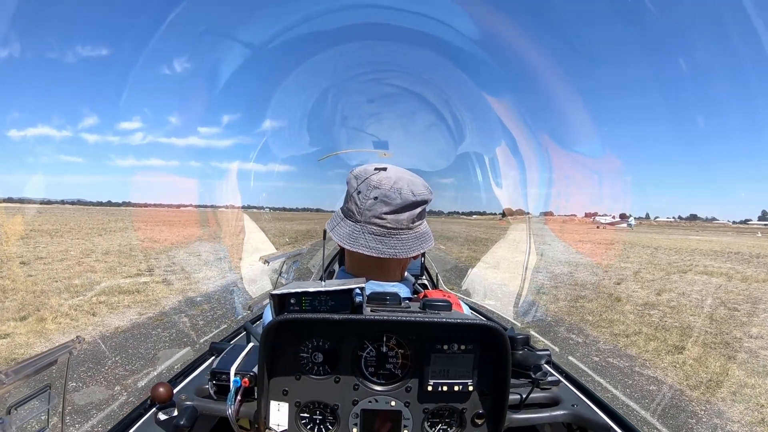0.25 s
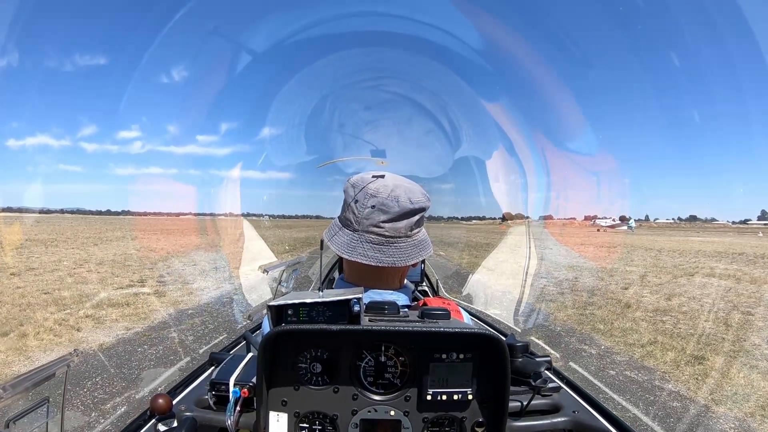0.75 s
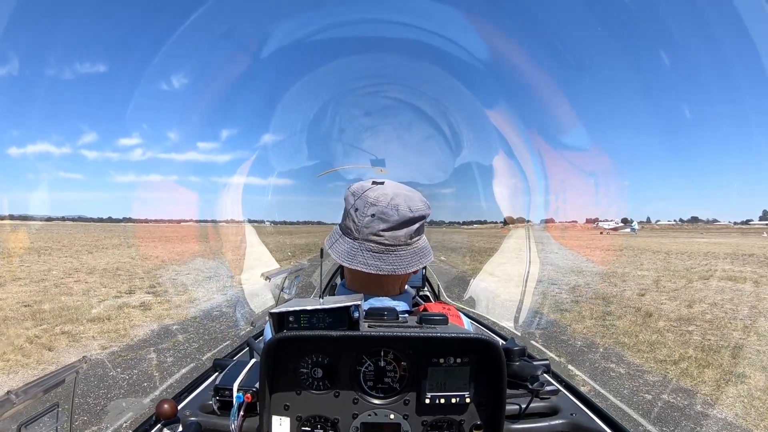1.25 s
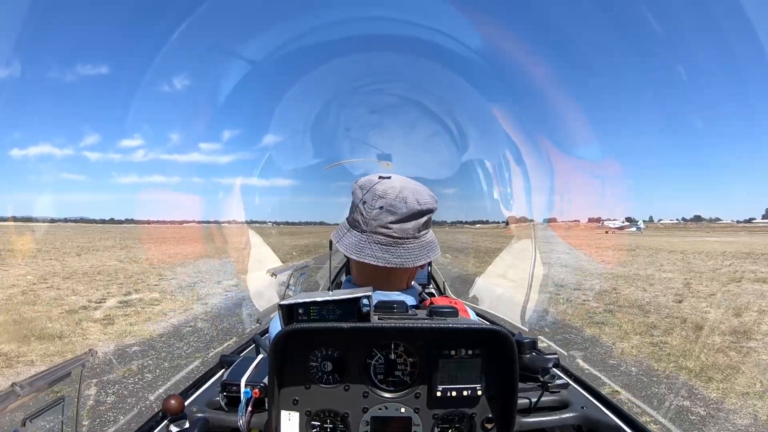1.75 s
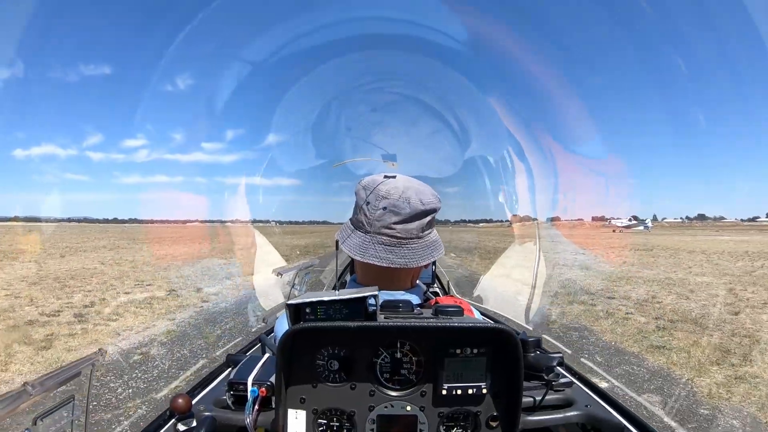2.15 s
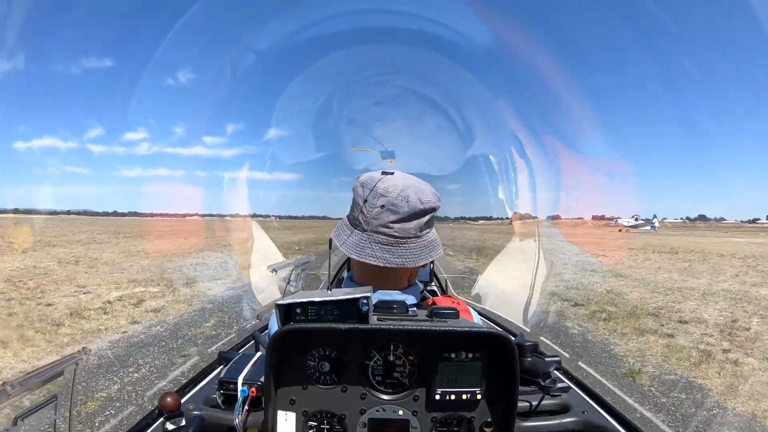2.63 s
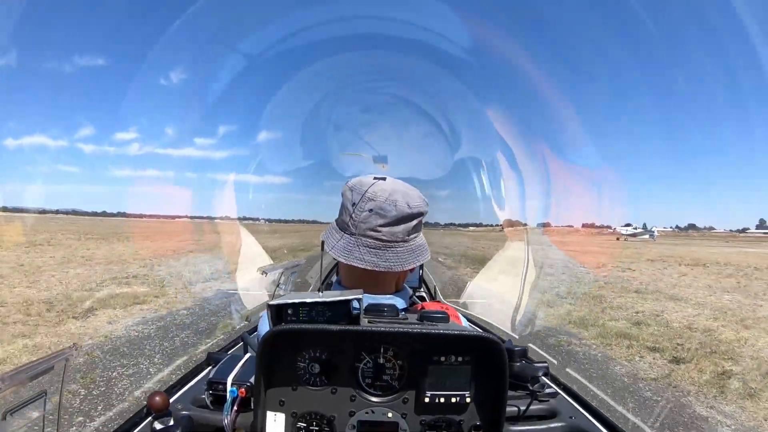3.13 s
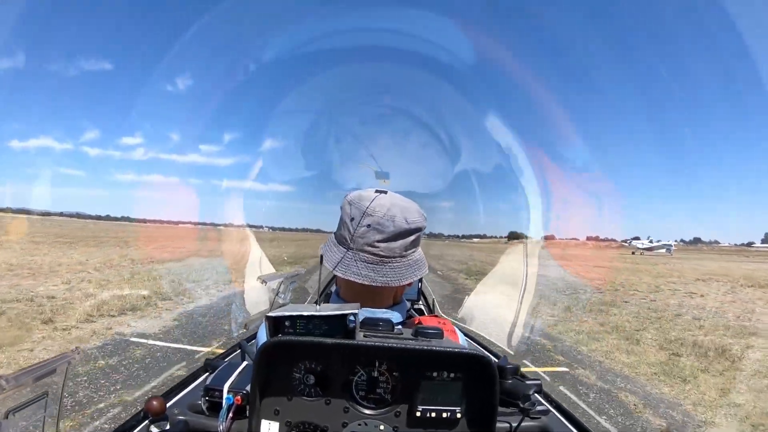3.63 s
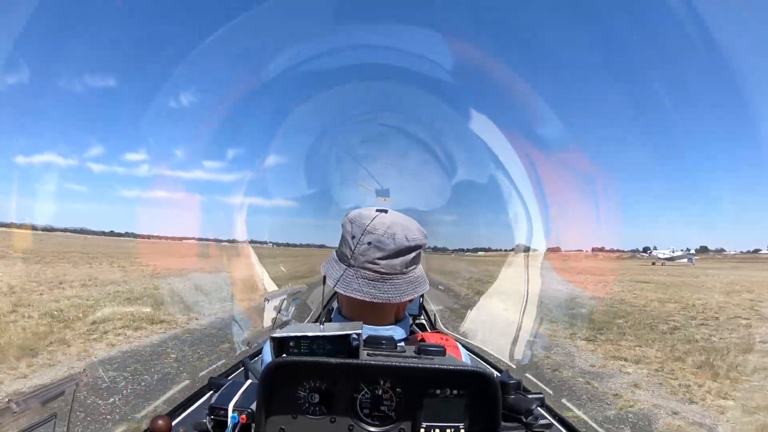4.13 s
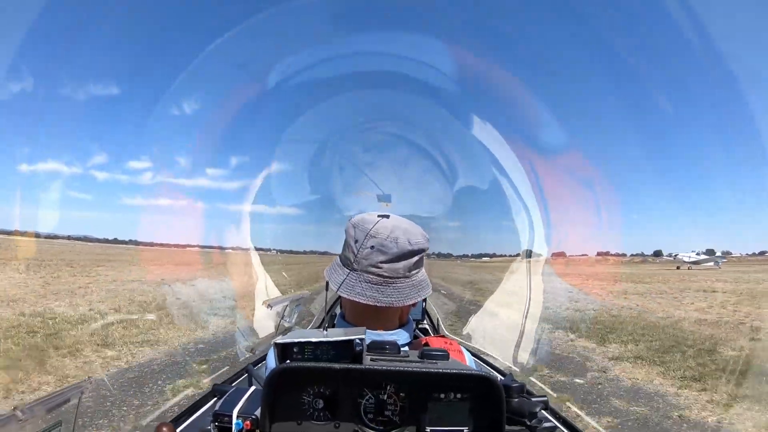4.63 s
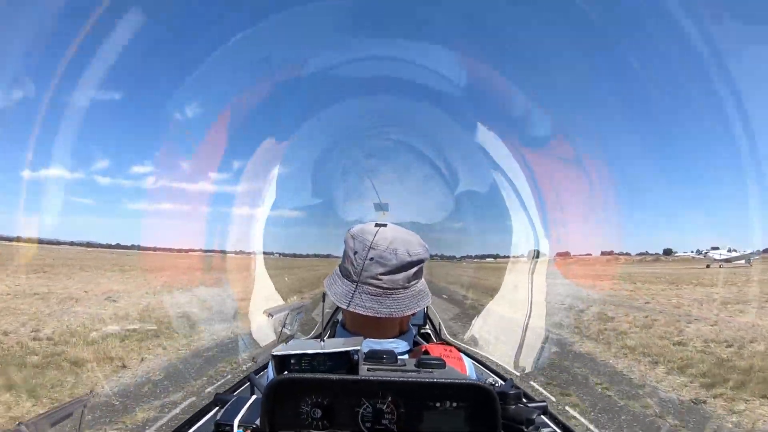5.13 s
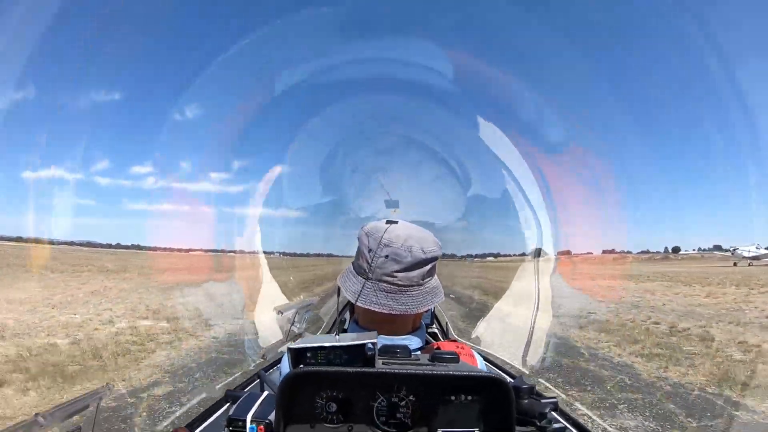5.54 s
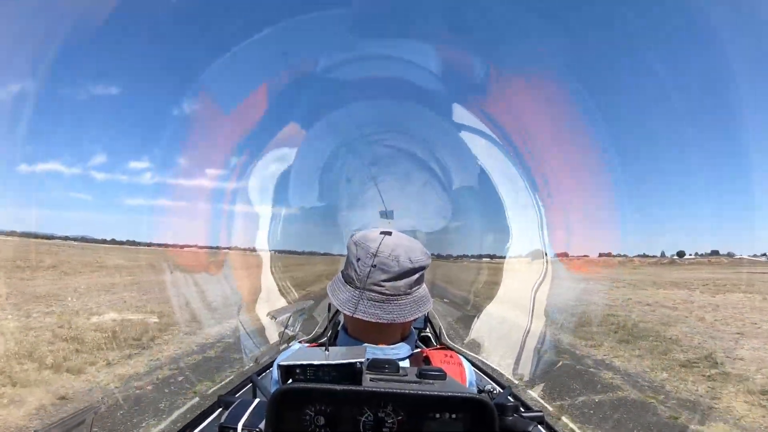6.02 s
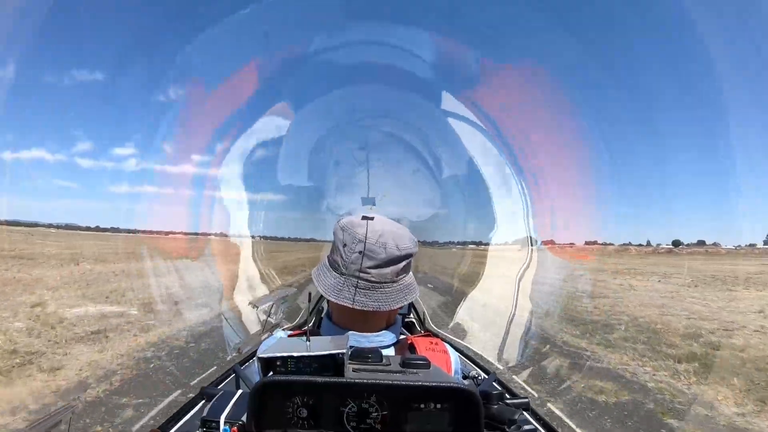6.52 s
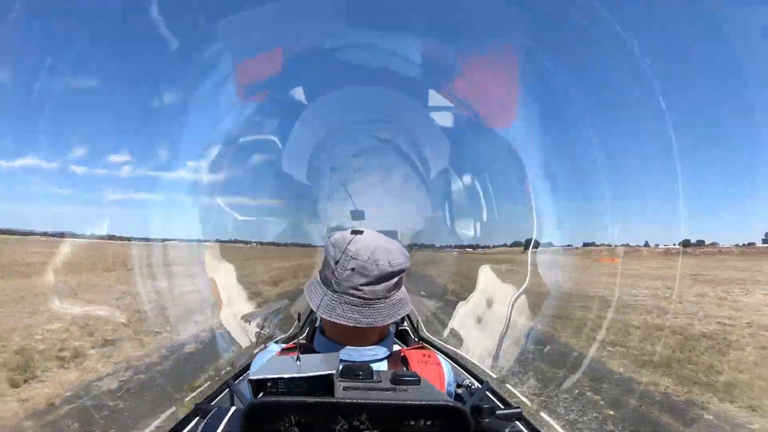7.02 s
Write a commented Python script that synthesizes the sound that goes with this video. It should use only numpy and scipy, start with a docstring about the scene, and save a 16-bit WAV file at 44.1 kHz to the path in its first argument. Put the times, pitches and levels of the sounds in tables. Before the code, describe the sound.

From a microphone inside a closed glider cockpit, a deep wheel rumble starts slowly and swells as the aircraft is towed down a runway. Early on, a cluster of hollow thumps hits the hull. Irregular ticks, light panel buzz and small scuffs follow over the rising tyre roar, with a weak drone underneath. Late on come a short creak and a last, softer bump while the rumble carries on.

```python
"""Inside the cockpit of a glider towed along a rough runway. It starts at a slow roll: the wheel shakes
the hull into a low boom over a drone, panels buzz, straps and seat rustle and scuff. Around the first two
seconds bumps knock the shell, and loose fittings begin to tick. As speed builds the boom swells and the
tyre roar rises; a joint creaks at 5.5 s and one last knock lands at 6.5 s. All of it is heard through
the two close ports of a small camera that holds the level down."""
import sys
import numpy as np
from scipy import signal
from scipy.fft import rfft, irfft, next_fast_len
from scipy.io import wavfile
from scipy.ndimage import uniform_filter1d, map_coordinates

SR = 44100
rng = np.random.default_rng(int(sys.argv[2]) if len(sys.argv) > 2 else 0)


def int16_out(signal):
    """Quantize to a 16-bit WAV file."""
    q = np.round(np.clip(np.atleast_2d(signal).T, -1, 1) * 32767)
    wavfile.write(sys.argv[1], SR, q.astype(np.int16))


N = 320607

# Roughness of the runway under the wheel. Each row: time in seconds, level in dB.
RUNWAY_ROUGHNESS = [(0, 0.5), (.62, 0.5), (.75, -2.5), (.9, 2), (1.5, 0.5), (1.69, 0.5), (2.04, 3.5),
                    (2.48, 3), (2.8, 2), (3.8, 3), (4.48, 2), (5.13, 3), (5.35, -0.7), (5.75, 0.5),
                    (6.25, -2.5), (6.55, 0.7), (7.09, -1.5), (7.25, 1)]
# The ring of the loose fittings. Each row: pitch in Hz, width in Hz, level in dB.
FITTING_MODES = [(1340, 500, 8.5), (2180, 700, 4.5), (3050, 680, 4.5), (3950, 660, -7), (4560, 430, 0),
                 (5720, 650, 4), (6700, 1300, 0)]


def hull_boom(roughness_db):
    """The wheel shakes the low hull modes: a throbbing boom that grows with speed, then levels off."""
    # Each row: pitch in Hz, width in Hz, level in dB.
    hull_modes = [(28.2, 4.7, -14), (66.1, 7.5, -1.5), (87.8, 21, -7), (114.65, 10.7, -1.5),
                  (132.3, 16, -3), (165, 25, -9), (186.1, 8.2, -9)]
    # Each row: time in seconds, hum level in dB, deep mode level in dB, both relative to the boom.
    low_end_mix = [(0, -12.5, -3.5), (1.55, -8.5, -2.5), (1.8, -2.5, -9.5), (4.9, -6, -11.5),
                   (5.6, -8, -2.5), (7.25, -4, -10)]
    top_db, knee_m_per_s, hum_hz = -16.5, 4.46, 66.5
    throb = amp(2.96 * wobble(5))
    boom = unit(filtered(throb * rng.standard_normal((2, N)), modes(hull_modes)))
    # A wandering hum and its octave sit inside the strongest mode.
    hum_db, deep_db = curves(low_end_mix)
    phase = 2 * np.pi * np.cumsum(hum_hz + 2.2 * wobble(7)) / SR
    hum_gain = amp(hum_db + 4.5 * wobble(6))
    octave = amp(-10 + 4.5 * wobble(5)) * np.sin(2 * phase)
    deep_mode = unit(filtered(rng.standard_normal(N), modes([(50.44, 8, 0)])))
    boom[0] += hum_gain * (np.sin(phase) + octave) + amp(deep_db) * deep_mode
    growth = (speed() / np.hypot(speed(), knee_m_per_s)) ** 2.34
    return growth * amp(top_db + roughness_db) * filtered(boom, lambda f: 1 / (1 + (f / 260) ** 4))


def tyre_roar(roughness_db):
    """The tyre roars louder with speed; the stiff hull cuts it steeply under and over its modes."""
    # Each row: pitch in Hz, width in Hz, level in dB.
    roar_modes = [(210.4, 33.6, 2.5), (257.6, 37.8, 2), (300.4, 46.2, 0.5), (378.6, 56, -5.5),
                  (460.6, 108.5, -13), (578, 16, -27.5), (755.6, 16, -20), (936, 54, -37.5)]
    walls = lambda f: modes(roar_modes)(f) * low_cut(f, 190) / (1 + (f / 900) ** 4)
    roar = unit(filtered(rng.standard_normal((2, N)) * amp(wobble(9)), walls))
    return (speed() / 10) ** 1.42 * amp(-27.5 + roughness_db) * roar


def shell_knocks():
    """A bump rings the low, middle and high modes of the shell; its hard edge snaps a few ms later."""
    # Each row: start in seconds, then thump, body, ring and snap levels in dB.
    bumps = [(0.8165, 6.5, 0.5, -4, -32.5), (0.904, -2, -7.5, -35, -44), (0.944, 9, 0.5, -39, -40),
             (1.096, 10, 0, -5, -31), (1.403, -8.5, -13.5, -33, -50), (1.494, 6, 1, -7, -38.5),
             (1.608, 0, -25, -18, -47.5), (1.998, 2, -11, -36, -51.5), (6.509, 1.5, -12, -34, -56)]
    # Each row: pitch in Hz, width in Hz, level in dB.
    shell_modes = [(245, 110, -1), (420, 360, -8), (590, 254, -4), (736, 110, -6.5), (870, 160, -3.5),
                   (1140, 130, -1.5), (1413, 87, 4), (1660, 320, -5)]
    start, thump_db, body_db, ring_db, snap_db = np.transpose(bumps)
    t60 = np.where(ring_db > -14, .047, .071)  # hard, ringing knocks are shorter
    thump = blows(start, thump_db, t60, shell_modes[:2], rough=.3, soft_hz=910)
    # The thump comes back once, a cycle of the shell later.
    rebound = blows(start + .00418, thump_db - 2.5, t60, shell_modes[:2], rough=.37, soft_hz=900)
    body = blows(start, body_db, t60, shell_modes[2:5], rough=.35, soft_hz=2570)
    ring = blows(start + .0012, ring_db, t60, shell_modes[5:], rough=.4, soft_hz=4110)
    snap = blows(start + .0048, snap_db, t60, FITTING_MODES[1:6])
    return thump + rebound + body + ring + snap


def fitting_ticks():
    """Loose fittings tick, each with its own brightness; faint ticks fall between, more often at speed."""
    # Each row: start in seconds, level in dB, upper modes relative to the lower in dB.
    main_ticks = [(1.3603, -31.5, -1.5), (1.6342, -37.5, -2.5), (1.937, -40, 2.5), (2.2176, -39, -2),
                  (2.3359, -44, -2.5), (2.374, -44.5, 4), (2.3974, -44.5, 0), (2.7107, -40.5, 1.5),
                  (2.843, -37, -2.5), (2.862, -41.5, 2.5), (3.2709, -23.5, 1), (3.357, -40, -11.5),
                  (3.6548, -38.5, 0), (3.7405, -34, 1), (3.8025, -32.5, -5), (3.8526, -39, -8),
                  (4.05, -55.5, 16), (4.0801, -40, -16.5), (4.2641, -42.5, -15.5), (4.2957, -38, -11.5),
                  (4.488, -39, -14), (4.6276, -37.5, -7.5), (5.0127, -32.5, -4.5), (5.047, -42.5, 0),
                  (5.065, -46, -1), (5.1133, -37.5, -8), (5.1514, -35.5, -0.5), (5.183, -42, -7),
                  (5.2, -42.5, -14), (5.222, -38.5, -6.5), (5.249, -31.5, -4), (5.273, -38, -13),
                  (5.293, -41, -7), (5.3284, -36.5, -8), (5.3649, -38, 4), (5.5025, -25, -2.5),
                  (5.8097, -36.5, 9), (5.8308, -37, 6), (5.909, -42.5, 5), (6.187, -45, 3.5),
                  (6.5979, -33, 1), (6.6704, -40, -22), (6.7157, -38, -12), (6.9371, -41, -13.5),
                  (7.089, -35.5, -2)]
    faint_count = 20
    travelled = np.cumsum(speed())
    faint_starts = np.searchsorted(travelled, rng.random((faint_count, 1)) * travelled[-1]) / SR
    faint_levels = rng.normal([-48.5, -8], 3.5, (faint_count, 2))
    start, db, upper_db = np.vstack([main_ticks, np.hstack([faint_starts, faint_levels])]).T
    t60 = np.full(len(start), .05)
    lower = blows(start, db, t60, FITTING_MODES[:4], rough=.78)
    upper = blows(start, db + upper_db, t60, FITTING_MODES[4:], rough=.69)
    return lower + upper


def panel_buzz(level_db):
    """Panels buzz with the shaking, a few of their modes standing out."""
    # The tone of the buzz. Each row: frequency in Hz, level in dB.
    buzz_tone = [(530, -28), (900, -0.5), (1210, -2), (1310, -3), (1450, -3), (2040, -8), (2600, -25),
                 (3380, -58.5), (5720, -120)]
    # Each row: pitch in Hz, width in Hz, level in dB.
    panel_modes = [(1190, 95, -3), (1320, 76, 1.5), (1690, 130, -8.5), (1910, 100, -4)]
    colour = lambda f: amp(along(buzz_tone, f)) * (1 + np.abs(modes(panel_modes)(f)))
    buzz = filtered(contact_noise(per_second=33, size_db=-.5, t60=.06), colour)
    return amp(level_db) * patchy(buzz, depth_db=.5)


def strap_rustle(level_db):
    """Seat cloth and straps rustle in many small, quick contacts."""
    # The tone of the rustle. Each row: frequency in Hz, level in dB.
    rustle_tone = [(1500, -31.5), (2250, -4.5), (2650, -5.5), (3350, -7.5), (4000, -11.5), (5800, -9.5),
                   (7000, -12.5), (8000, -21.5), (10000, -29), (12500, -39), (15500, -50.5)]
    contacts = contact_noise(per_second=55, size_db=-2, t60=.014)
    rustle = filtered(contacts, lambda f: amp(along(rustle_tone, f)))
    return amp(level_db + 1.3 * wobble(22)) * patchy(rustle, depth_db=2)


def cabin(roughness_db):
    """One shake moves both panels and straps; rough ground lifts the buzz a little."""
    # Each row: time in seconds, buzz level in dB, rustle level in dB.
    faders = [(0, -62.5, -68.5), (.4, -64.5, -72.5), (.89, -60, -66), (1.03, -55, -54),
              (1.27, -55.5, -65.5), (1.82, -56.5, -63), (2.2, -60, -66), (3.23, -59, -65), (3.9, -57, -66),
              (4.7, -54, -67), (5.2, -51.5, -61.5), (5.6, -53.5, -60), (5.98, -51.5, -66.5),
              (6.66, -46.5, -62), (7.25, -51, -62)]
    buzz_db, rustle_db = curves(faders)
    shake = wobble(9.9)
    return panel_buzz(buzz_db + .26 * roughness_db + .97 * shake) + strap_rustle(rustle_db + .26 * shake)


def scuffs():
    """Brief swells of crackly friction, dull from the hull, bright from cloth or strap."""
    # Each row: start in seconds, length in seconds, centre in Hz, width in Hz, level in dB.
    rubs = [(0.17, 0.073, 7000, 1600, -69), (0.673, 0.03, 3700, 400, -63), (0.89, 0.21, 6100, 1800, -58),
            (1.1, 0.34, 5300, 2800, -62), (1.91, 0.066, 7000, 1000, -62.5), (2.01, 0.073, 7000, 1400, -61),
            (2.095, 0.075, 5700, 2700, -56.5), (2.7, 0.05, 8100, 1200, -65), (0.11, 0.18, 493, 65, -42.5),
            (0.5007, 0.047, 290, 140, -29.5), (0.485, 0.055, 600, 970, -48), (7.02, 0.12, 1300, 930, -41.5),
            (4.96, 0.7, 2800, 900, -62.5), (3.355, .05, 1700, 150, -54.5),
            (3.745, 0.053, 1900, 1200, -50.5), (1.59, 0.4, 1210, 35, -57.5),
            (1.684, 0.24, 1600, 260, -56.5), (6.464, 0.17, 780, 110, -39), (6.676, 0.048, 350, 60.5, -53),
            (6.758, 0.14, 650, 290, -37.5)]
    out = np.zeros((2, N))
    grit = amp(3.5 * wobble(300)) * rng.standard_normal((2, N))
    for start, length, hz, width_hz, db in rubs:
        at, n = round(start * SR), round(length * SR)
        band = np.exp(-((np.fft.rfftfreq(n, 1 / SR) - hz) / width_hz) ** 2)
        rub = unit(irfft(rfft(grit[:, at:at + n]) * band, n))
        out[:, at:at + n] += amp(db) * np.hanning(n) ** .55 * rub
    return out


def joint_creaks():
    """A joint slips unevenly, about 200 times a second, ringing a sinking resonance and its overtone."""
    # Each row: start in seconds, length in seconds, first pitch in Hz, last pitch in Hz, level in dB.
    creaks = [(5.43, .065, 1600, 1500, -41), (5.515, .035, 1680, 1550, -39), (5.548, .03, 1200, 1120, -37)]
    out, t = np.zeros((2, N)), np.arange(600) / SR
    envelope = (1 - np.exp(-t / .0004)) * amp(-60 * t / .051) * np.hanning(2 * len(t))[len(t):]
    for start, length, first_hz, last_hz, db in creaks:
        for elapsed in np.arange(0, length, .0052):
            hz = (first_hz + (last_hz - first_hz) * (elapsed / length) ** 2) * rng.normal(1, .044)
            slip = np.sin(2 * np.pi * hz * t) + .19 * np.sin(2 * np.pi * 1.9 * hz * t)
            slip *= amp(db + rng.normal(0, 2.8)) * envelope
            swell = np.sin(np.pi * (elapsed + .0051) / (length + .019)) ** .36
            at = round((start + elapsed + rng.normal(0, .001)) * SR)
            out[:, at:at + len(t)] += swell * slip
    return out


def thin_clicks():
    """Tiny bright clicks: fast-dying noise in one wide, high band."""
    # Each row: start in seconds, level in dB.
    clicks = [(2.374, -58), (3.6554, -64.5), (5.3651, -56), (5.579, -68.5), (6.5977, -59.5), (7.1324, -63)]
    centre_hz, width_hz, t60 = 11500, 5000, .02
    out, t = np.zeros((2, N)), np.arange(SR // 20) / SR
    for start, db in clicks:
        at = round(start * SR)
        out[:, at:at + len(t)] += amp(db - 60 * t / t60) * rng.standard_normal((2, len(t)))
    band = modes([(centre_hz, width_hz, 0)])
    return filtered(out, lambda f: band(f) ** 2)


def drone():
    """A bed of noise in narrow resonances, likely the tow plane heard through the canopy."""
    # Each row: pitch in Hz, width in Hz, level in dB.
    drone_modes = [(248, 19, -6), (287, 43, -3), (391, 55, 0), (510.5, 52.3, -2.5), (733, 20, -8),
                   (1207, 20, -19), (3364, 26, -26.5), (5300, 170, -44)]
    # The drone sinks midway and comes back. Each row: time in seconds, level in dB.
    fader = [(0, -47.5), (.1, -47.5), (1.5, -46), (3.5, -57), (7.25, -42.5)]
    gain = amp(curves(fader)[0] + 2 * wobble(10))
    colour = lambda f: modes(drone_modes)(f) * low_cut(f, 230)
    return gain * unit(filtered(rng.standard_normal((2, N)), colour))


def speed():
    """Rolling speed in m/s, rising steadily under tow."""
    return 1.34 + 1.797 * np.arange(N) / SR


def blows(starts, levels_db, t60s, mode_table, rough=1, soft_hz=7000):
    """Each blow rings the modes at fresh strengths; rough blends from one clean push to dying noise."""
    out, t = np.zeros((2, N + SR)), np.arange(SR // 5) / SR
    f = np.fft.rfftfreq(len(t), 1 / SR)
    attack, cabin_tail = 1 - np.exp(-t / .00074), .18 * amp(-60 * t / .18)
    softening = (1 + 1j * f / soft_hz) ** 2 * (1 + 1j * f / 6500 - (f / 8500) ** 2)
    for start, db, t60 in zip(starts, levels_db, t60s):
        decay = amp(-60 * t / t60) + cabin_tail
        drive = rough * attack * decay * rng.standard_normal((2, len(t)))
        drive[0, 40] -= 12 * (1 - rough)  # the push
        struck = [(hz, width, mode_db + rng.normal(0, 1.4)) for hz, width, mode_db in mode_table]
        at = round(start * SR)
        out[:, at:at + len(t)] += amp(db) * irfft(rfft(drive) * modes(struck)(f) / softening, len(t))
    return out[:, :N]


def contact_noise(per_second, size_db, t60):
    """Two noises whose level jumps at random contacts and falls back after each."""
    hits = (rng.random(N) < per_second / SR) * amp(size_db * np.minimum(rng.exponential(size=N), 2))
    fade = signal.lfilter([1], [1, -amp(-60 / (t60 * SR))], hits)
    return (1 + uniform_filter1d(fade, size=150)) * rng.standard_normal((2, N))


def patchy(x, depth_db):
    """Mottles a sound with random patches of gain over time and frequency, at unit RMS."""
    spectra = signal.stft(x, nperseg=512)[2]
    patches = uniform_filter1d(rng.standard_normal(spectra.shape[1:]), size=5, axis=0)
    patches = unit(uniform_filter1d(patches, size=6, axis=1))
    return unit(signal.istft(spectra * amp(depth_db * patches), nperseg=512)[1][:, :N])


def modes(table):
    """Causal response of a set of resonances, alternating in polarity."""
    return lambda f: sum((-1) ** k * amp(db) * 1j * f * width / (hz * hz - f * f + 1j * f * width)
                         for k, (hz, width, db) in enumerate(table))


def low_cut(f, corner_hz):
    """Gain that falls 12 dB an octave under the corner."""
    return (f / corner_hz) ** 2 / (1 + (f / corner_hz) ** 2)


def filtered(x, response):
    """Shapes a sound with a complex response of frequency."""
    size = next_fast_len(N + SR // 2)
    return irfft(rfft(x, size) * response(np.fft.rfftfreq(size, 1 / SR)), size)[..., :N]


def wobble(rate):
    """A smooth random curve, rate knots a second."""
    return map_coordinates(rng.standard_normal(int(N * rate / SR) + 4), [np.arange(N) * rate / SR])


def curves(rows):
    """One automation curve for each column after the time."""
    times, *columns = np.transpose(rows)
    return [np.interp(np.arange(N) / SR, times, column) for column in columns]


def along(points, hz):
    """Joins (Hz, value) points on a log frequency axis."""
    f, values = np.transpose(points)
    return np.interp(np.log(hz + 1), np.log(f + 1), values)


def amp(db):
    """Decibels to gain."""
    return 10 ** (np.asarray(db) / 20)


def unit(x):
    """Scales to unit RMS."""
    return x / np.sqrt(np.mean(x ** 2) + 1e-20)


def scene():
    """Every source has a mid row, alike at both ports, and a side row, opposite in the two."""
    # Stereo width. Each row: frequency in Hz, side level in dB.
    side_tone = [(60, -34.5), (250, -26.5), (500, -6.5), (1500, -6.5), (4000, -8.5), (8000, -1.5),
                 (12000, -7.5)]
    roughness_db, = curves(RUNWAY_ROUGHNESS)
    bed = hull_boom(roughness_db) + tyre_roar(roughness_db) + cabin(roughness_db) + drone()
    mid, side = bed + shell_knocks() + fitting_ticks() + scuffs() + joint_creaks() + thin_clicks()
    side = filtered(side, lambda f: amp(along(side_tone, f)))
    return np.array([mid + side, mid - side])


def record(dry):
    """Each port has its own colour, delay and hiss; quick gain control and a soft ceiling tame swells."""
    # Each row: frequency in Hz, left level minus right in dB.
    balance = [(60, -4.5), (100, -4.0), (170, -4.5), (290, -6.5), (500, -8.0), (850, -4.0), (1450, -0.5),
               (2470, 0.5), (4190, -0.5), (7130, -0.5)]
    # Each row: frequency in Hz, phase lead of the left port in radians.
    left_lead = [(150, 0.22), (300, -0.7), (430, -0.7), (780, 1.65), (1900, 1.55), (2600, 1.17),
                 (4300, -0.05), (5300, 0), (6100, 2), (6600, -3), (8000, -2.5), (11000, -1)]
    hiss_db, knee_db, makeup_db, ceiling, top_hz = -87.5, -14.5, 1.5, .85, 15600
    left_port = lambda f: amp(along(balance, f) / 2) * np.exp(.5j * along(left_lead, f))
    wet = filtered(dry, lambda f: np.array([left_port(f), 1 / left_port(f)]))
    hiss = filtered(rng.standard_normal((2, N)), lambda f: f / 4000 / (1 + (f / 7000) ** 5))
    wet += amp(hiss_db) * unit(hiss)
    level = np.sqrt(np.abs(uniform_filter1d(np.mean(wet ** 2, 0), size=900)))
    ducking = uniform_filter1d((1 + (level / amp(knee_db)) ** 2) ** -.3, size=500)
    wet *= ducking * amp(makeup_db)
    wet /= (1 + np.abs(wet / ceiling) ** 4) ** .25
    return filtered(wet, lambda f: f < top_hz)


dry = scene()
out = record(dry)
int16_out(out)
```